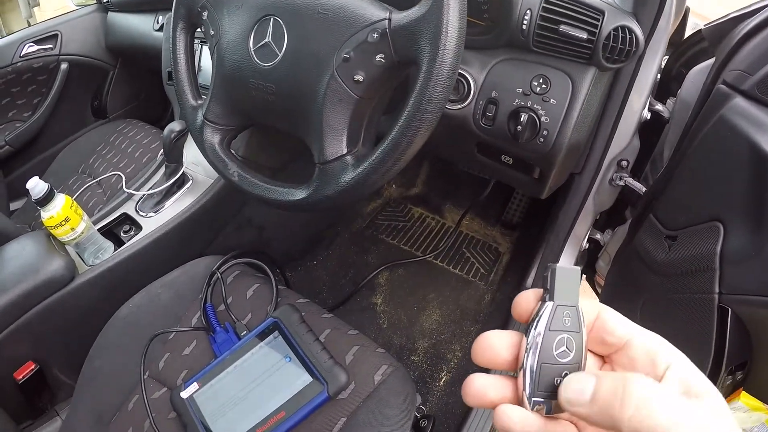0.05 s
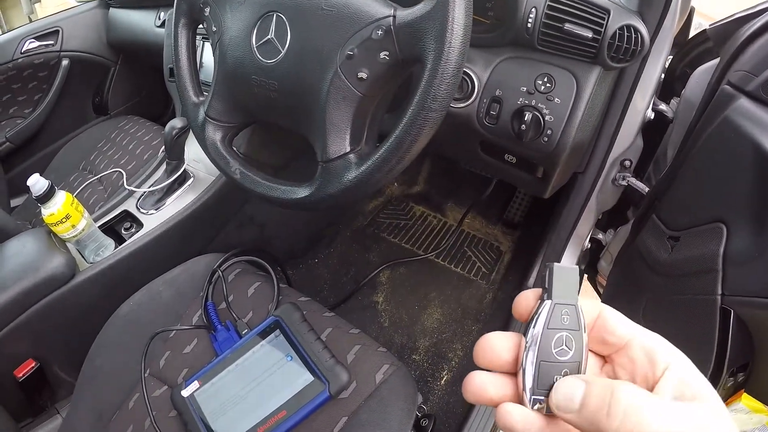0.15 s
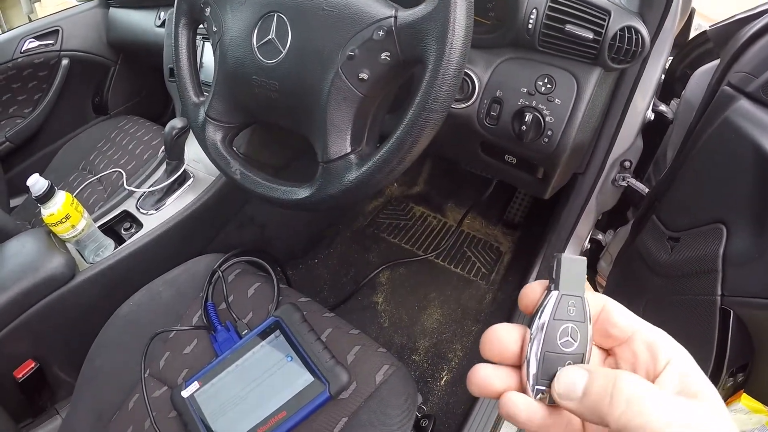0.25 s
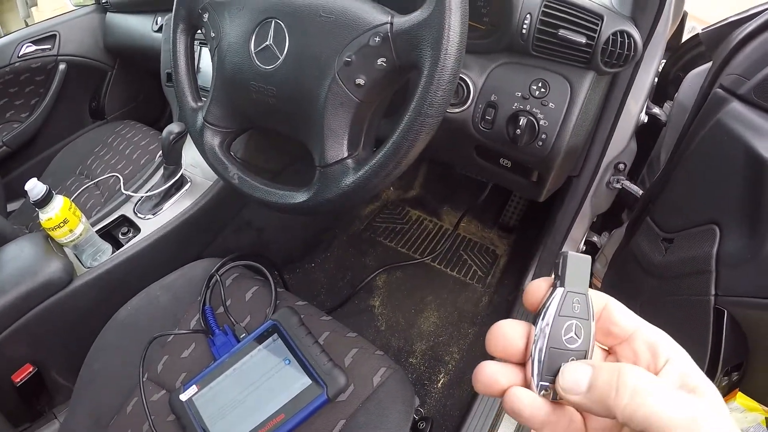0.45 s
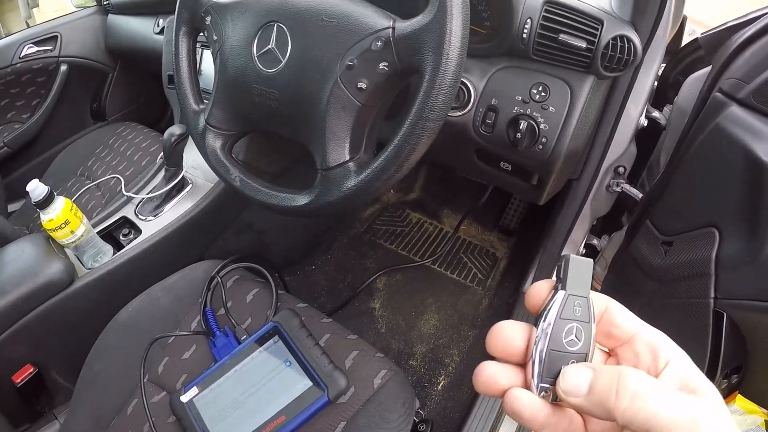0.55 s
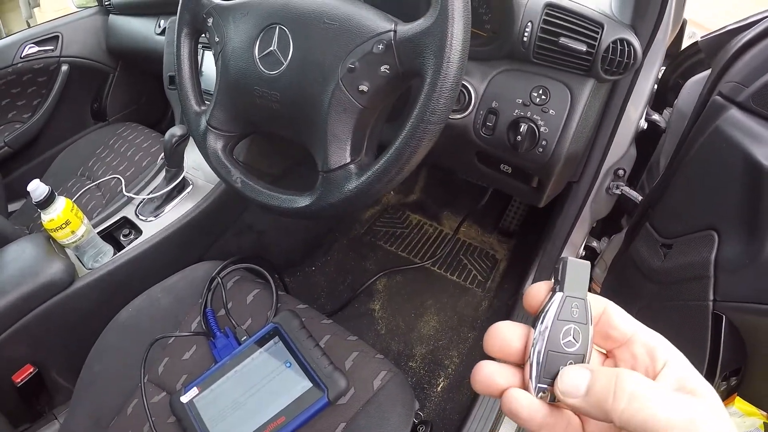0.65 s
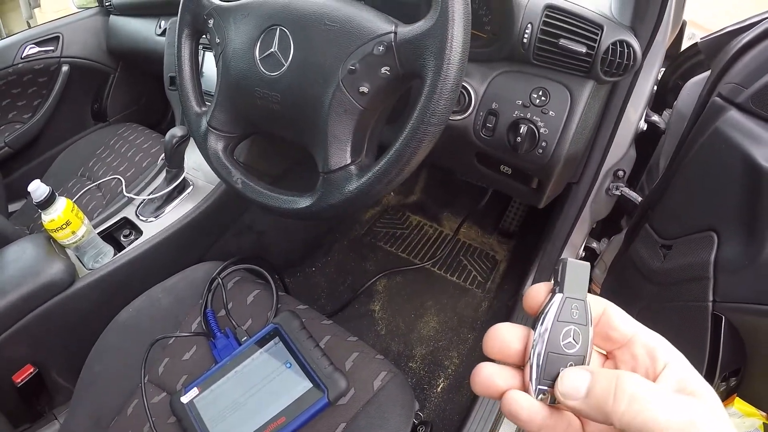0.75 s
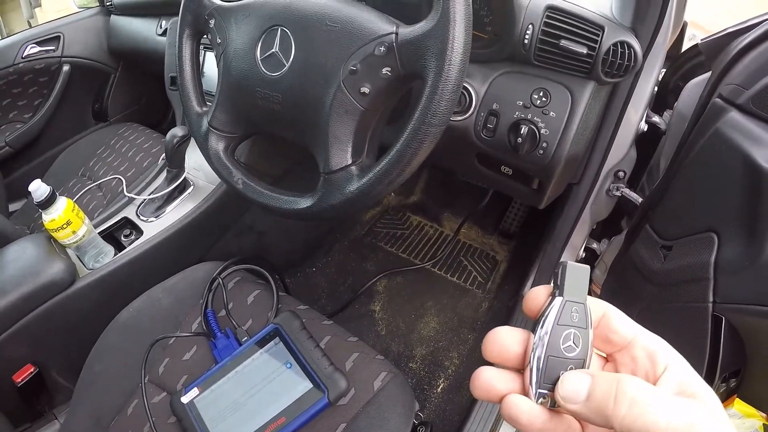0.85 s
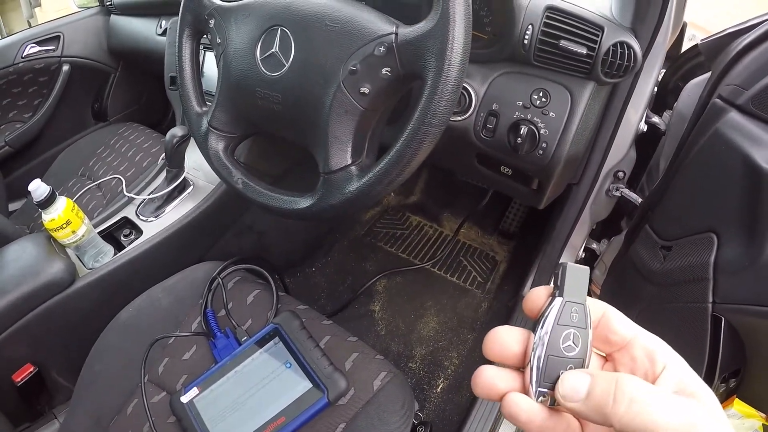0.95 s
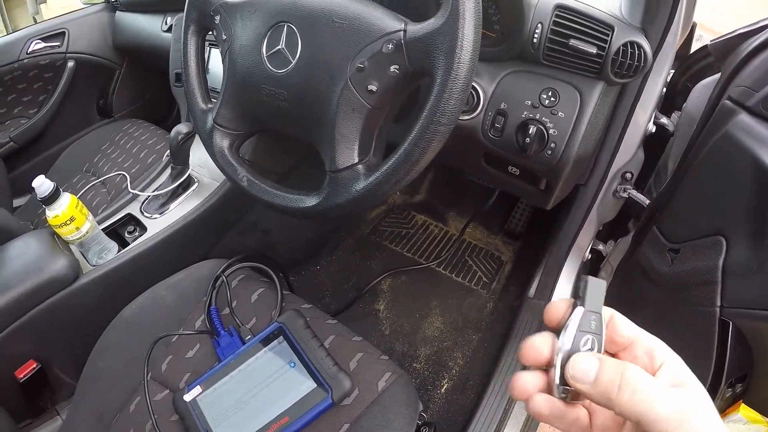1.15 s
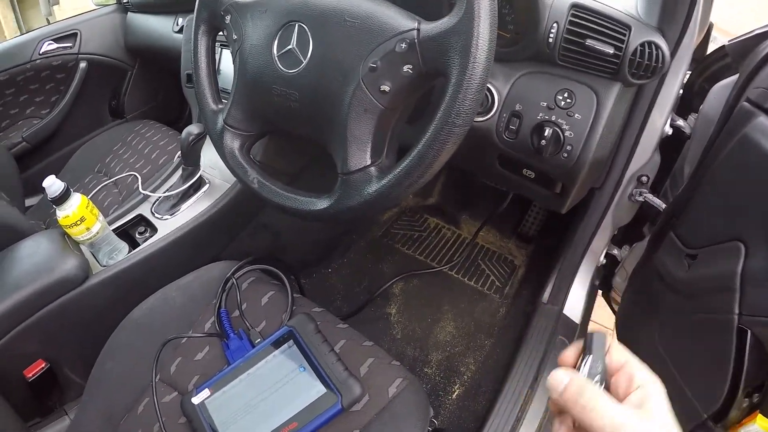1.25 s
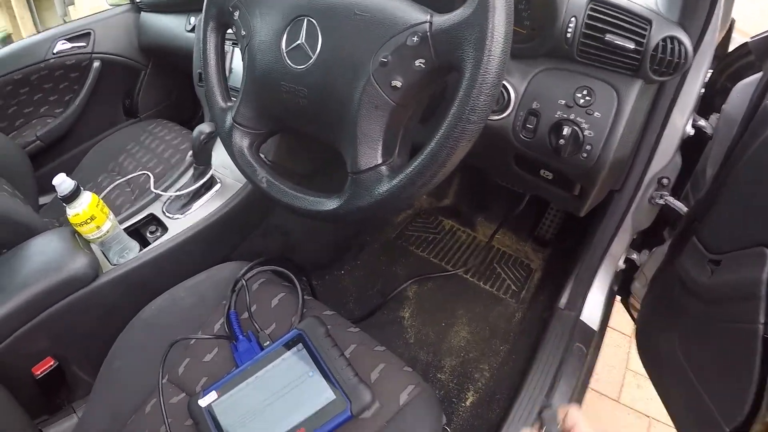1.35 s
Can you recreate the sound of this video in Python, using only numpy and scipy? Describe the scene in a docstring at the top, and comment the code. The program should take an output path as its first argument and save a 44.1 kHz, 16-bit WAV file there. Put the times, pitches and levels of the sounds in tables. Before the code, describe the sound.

Close press and release of a key fob button, followed by quiet car locks working.

```python
"""Key fob and central locking

At the open door of a car, a plastic key fob is pressed and released close to the microphone.
The locks answer: actuators clack, their small motors whir and hit their stops, a metal link ticks,
a last lock clunks. A light breeze puffs on the microphone over quiet outdoor air."""
import sys
import numpy as np
from scipy import signal
from scipy.fft import rfft, irfft
from scipy.io import wavfile

SR = 44100
rng = np.random.default_rng(int(sys.argv[2]) if len(sys.argv) > 2 else 0)


def master_out(mix):
    """Clip the mix to full scale and print it as 16-bit PCM to the path in sys.argv[1]."""
    frames = np.transpose(np.atleast_2d(mix))
    ceiling = np.clip(frames, -1, 1)
    pcm = np.round(ceiling * 32767).astype(np.int16)
    wavfile.write(sys.argv[1], SR, pcm)


N = 61739

# button down, then up, close to the microphone (time [s], level [dB], signed push, tilt [dB/octave])
BUTTON_STROKES = [(.3067, -0.5, -1.015, 1.5), (0.7363, 2, 0.95, 1.5)]
# snap of the switch dome (frequency [Hz], level [dB])
DOME_SPECTRUM = [(300, -54), (560, -15.5), (950, -6), (1500, -3.5), (2300, 0), (2800, 5), (3300, -9.5),
                 (4400, -12), (6200, -16), (8500, -27), (13000, -27.5), (16000, -43)]
# the fob's plastic shell (frequency [Hz], level [dB], t60 [s])
SHELL_MODES = [(1700, -52, 0.049), (2110, -51, 0.048), (2320, -43, 0.041), (2500, -45, 0.052),
               (2725, -43, 0.023), (3010, -43, 0.037), (3490, -48.5, 0.037), (4460, -39, .02),
               (5310, -56, 0.041), (6300, -43.5, 0.024)]
# the cabin, heard through the open door (frequency [Hz], level [dB])
CABIN_SPECTRUM = [(400, 3), (1000, -14), (1700, 1.5), (2800, 1.5), (4500, -8), (7000, -17), (15000, -23)]
# the button settling in its seat (frequency [Hz], level [dB])
CHATTER_SPECTRUM = [(500, -36), (1000, -1), (3000, 2.5), (6000, -6.5), (15000, -12.5)]
CABIN_DELAY_S = 0.0065


def fob():
    """Close up, the switch dome snaps, the shell rings and the button settles; the cabin answers."""
    out = np.zeros(N)
    for s, db, push, tilt in BUTTON_STROKES:
        snap = amp(-7.5) * impulse(s, DOME_SPECTRUM, tilt)
        shell = ring(s, SHELL_MODES, rise_s=0.00065)
        cabin = amp(-42) * noise(CABIN_SPECTRUM) * fade(s + CABIN_DELAY_S, t60=0.034, rise_s=0.0013)
        chatter = amp(-34.5) * noise(CHATTER_SPECTRUM) * fade(s, t60=0.016, rise_s=0.00019)
        out += amp(db) * (push * (snap + shell) + cabin + chatter)
    return out


# actuator blows (time [s], level [dB], t60 [s], tilt [dB/octave], crack [dB], treble cutoff [Hz])
ACTUATOR_BLOWS = [(0.7936, -38, 0.09, -2, 2, 11000), (.801, -40, 0.058, -1, -16, 8950),
                  (.965, -39, 0.082, 2, -12, 9000), (0.976, -41, 0.059, 1, -19, 8000),
                  (1.296, -40, 0.056, 1.5, -14, 4870), (1.304, -46.5, 0.26, -0.5, -19, 4560)]
# a blow heard through the door panel (frequency [Hz], level [dB])
DOOR_SPECTRUM = [(88, -39), (150, -2.5), (243, -6), (337, -2), (1030, -7), (1600, -9.5), (1730, -7.5),
                 (2140, -18), (2310, -12.5), (4370, -19.5), (4720, -18.5), (7940, -36.5), (15000, -44)]
# crack of the actuator housing (frequency [Hz], level [dB])
HOUSING_SPECTRUM = [(600, -17), (1500, -10), (2100, 8.5), (2600, -4.5), (3050, 3.5), (3700, -8.5),
                    (4500, -10), (6000, -19), (7400, -19.5), (14000, -37)]
# the door panel ringing (frequency [Hz], level [dB], t60 [s])
PANEL_MODES = [(357.4, -13.5, 0.36), (775, -14, 0.16), (895, -12.5, 0.14), (1042, -8.5, .11),
               (1271, -10, 0.11), (1523, -16, 0.099), (1780, -8, .12), (2480, -18, 0.12),
               (4130, -15.5, .07)]
CLACK_RISE_S = 0.0017


def actuator_clacks():
    """Actuators start and hit their stops: housings crack, the panel rings, trim swallows the treble."""
    out = np.zeros(N)
    for s, db, t60, tilt, crack_db, cutoff_hz in ACTUATOR_BLOWS:
        blow = noise(DOOR_SPECTRUM, tilt) + amp(crack_db) * noise(HOUSING_SPECTRUM)
        blow *= fade(s, t60, CLACK_RISE_S)
        panel = ring(s, PANEL_MODES, tilt, CLACK_RISE_S)
        trim = signal.butter(3, cutoff_hz, fs=SR, output="sos")
        out += amp(db) * signal.sosfilt(trim, blow + panel)
    return out


# thuds from inside the door (time [s], level [dB])
DOOR_THUDS = [(.803, -35.5), (.975, -51), (1.309, -50.5)]
# the door's hollow body (frequency [Hz], level [dB], t60 [s])
BODY_MODES = [(184, -8, 0.11), (223.8, 4, 0.11), (302, -5, 0.18), (440.3, -7, 0.25), (720, 4.5, 0.045),
              (869, -10, 0.11)]


def door_thuds():
    """The hollow door booms briefly with each pair of clacks."""
    return sum(amp(db) * ring(s, BODY_MODES, rise_s=0.004) for s, db in DOOR_THUDS)


# tone of the meshing gears (multiple of the mesh pitch, level [dB])
MESH_HARMONICS = [(1, -47), (3, -57.5), (5, -62)]
# rasp of the gears (frequency [Hz], level [dB])
RASP_SPECTRUM = [(88, -23), (150, 2.5), (350, -16), (535, -0.5), (636, -12), (742, -3.5), (1200, -20),
                 (1800, -13), (2060, -19), (2550, -9), (2750, -17), (3470, -13), (6550, -37.5),
                 (11200, -52), (15000, -44)]
MOTOR_ON_S, MOTOR_OFF_S, MOTOR_RISE_S, MOTOR_STOP_S = 0.80, 0.98, 0.011, 0.013
MESH_HZ, SPIN_UP_S, TONE_RISE_S = 536, 0.019, 0.097
WAVER_DEPTH, TOOTH_DEPTH = 0.0053, 0.53


def lock_motors():
    """Small geared motors spin up: a swelling mesh tone and a rasp that pulses with each tooth."""
    drive = rise(MOTOR_ON_S, MOTOR_RISE_S) * np.exp(-since(MOTOR_OFF_S) / MOTOR_STOP_S)
    waver = 1 + WAVER_DEPTH * noise([(1, 0), (40, 0), (120, -60)])
    pitch_hz = MESH_HZ * rise(MOTOR_ON_S, SPIN_UP_S) * waver
    phase = 2 * np.pi * np.cumsum(pitch_hz) / SR
    tone = np.sqrt(2) * sum(amp(db) * np.sin(k * phase) for k, db in MESH_HARMONICS)
    rasp = amp(-47) * noise(RASP_SPECTRUM) * (1 + TOOTH_DEPTH * np.cos(phase))
    return drive * (rise(MOTOR_ON_S, TONE_RISE_S) * tone + rasp)


# ticks of the linkage (time [s], level [dB], t60 [s], tilt [dB/octave], sizzle [dB], ring [dB])
LINK_TICKS = [(.8765, -41, 0.049, -0.5, -6.5, -6.5), (1.2295, -46, .06, -1, -16, 2),
              (1.268, -61, 0.036, 1, -22, -8)]
# colour of a tick (frequency [Hz], level [dB])
TICK_SPECTRUM = [(250, -22), (1200, -6), (2200, -1.5), (4000, 2), (5800, -5.5), (9000, -9.5),
                 (14500, -11.5)]
# high sizzle on a tick (frequency [Hz], level [dB])
SIZZLE_SPECTRUM = [(3000, -54), (9000, -5.5), (11500, -14), (13200, 1), (15000, -12.5)]
# the metal link ringing (frequency [Hz], level [dB], t60 [s])
METAL_MODES = [(626, -10, 0.19), (2190, -8, 0.053), (2980, -7, 0.077), (3975, 1.5, 0.045),
               (5010, -11.5, 0.042), (6700, -2.5, 0.018)]


def linkage_ticks():
    """The lock's metal linkage ticks brightly and rings."""
    out = np.zeros(N)
    for s, db, t60, tilt, sizzle_db, ring_db in LINK_TICKS:
        tick = noise(TICK_SPECTRUM, tilt) + amp(sizzle_db) * noise(SIZZLE_SPECTRUM)
        tick *= fade(s, t60, rise_s=0.00076)
        out += amp(db) * (tick + amp(ring_db) * ring(s, METAL_MODES))
    return out


# click of the relay (frequency [Hz], level [dB])
RELAY_SPECTRUM = [(900, -18), (1700, -7), (2500, 0), (3800, -21), (12000, -36)]


def relay():
    """A relay drops with a faint, dull click after the motors stop."""
    return amp(-44.5) * noise(RELAY_SPECTRUM) * fade(s=1.0768, t60=0.0074, rise_s=0.00022)


# strength of the breeze at the microphone (time [s], level [dB])
BREEZE_LEVELS = [(0, -49.5), (.14, -47), (.21, -33), (.30, -27.5), (.385, -28), (.42, -39.5), (.52, -30),
                 (.62, -38.5), (.72, -40.5), (.78, -47), (.85, -40.5), (1.0, -46.5), (1.18, -47),
                 (1.26, -51), (1.4, -50)]
# wind rumble on the microphone (frequency [Hz], level [dB])
RUMBLE_SPECTRUM = [(15, -13), (30, -1.5), (60, -6), (90, -9.5), (130, -25.5), (200, -44.5), (400, -51.5),
                   (1000, -96)]
# single puffs on the microphone (time [s], level [dB], half width [s])
WIND_PUFFS = [(.238, -14.5, .0026), (0.261, -21.5, 0.0057), (0.286, -23.5, 0.0033), (.351, -6, .0023),
              (0.4522, -27, .0018), (0.514, -30, 0.0019), (0.534, -36.5, 0.0012), (0.641, -26, 0.0027)]
# fluttering air (frequency [Hz], level [dB])
TURBULENCE_SPECTRUM = [(40, -7), (90, -4.5), (160, 0), (260, -17.5), (420, -27), (900, -82)]
SUCTION_DELAY_S, SUCTION_SHARE = 0.00954, 0.82


def breeze():
    """Wind right on the microphone: a low rumble, puffs that push, pull and flutter, and one eddy."""
    rumble = amp(np.interp(since(0), *np.transpose(BREEZE_LEVELS))) * noise(RUMBLE_SPECTRUM)
    puffs = sum(amp(db) * (bump(s, width) - SUCTION_SHARE * bump(s + SUCTION_DELAY_S, width))
                for s, db, width in WIND_PUFFS)
    flutter = amp(-24) * sum(amp(db) * bump(s, width_s=0.0096) for s, db, _ in WIND_PUFFS)
    eddy = amp(-34.5) * bump(s=0.5347, width_s=0.019)
    return rumble + puffs + (flutter + eddy) * noise(TURBULENCE_SPECTRUM)


# open air around the car (frequency [Hz], level [dB])
AIR_SPECTRUM = [(60, -8.5), (130, -8), (220, -7.5), (480, -14), (800, -16.5), (1450, -23.5), (3900, -27.5),
                (8000, -33), (15000, -39.5)]
# a soft rustle (frequency [Hz], level [dB])
RUSTLE_SPECTRUM = [(100, -3), (200, 8), (330, -11), (600, -25), (1200, -16), (3000, -38), (10000, -45)]


def outdoor_air():
    """Quiet, steady air around the car, and a soft rustle that dies away at the start."""
    air = amp(-59.5) * noise(AIR_SPECTRUM)
    rustle = amp(-46) * noise(RUSTLE_SPECTRUM) * fade(0, t60=0.24, rise_s=0.013)
    return air + rustle


def amp(db):
    """Decibels to gain."""
    return 10 ** (np.asarray(db) / 20)


def since(s):
    """Seconds since time s, zero before it."""
    return np.maximum(np.arange(N) / SR - s, 0)


def rise(s, rise_s):
    """Exponential climb from 0 towards 1, starting at s."""
    return 1 - np.exp(-since(s) / rise_s)


def fade(s, t60, rise_s):
    """Quick attack at s, then a decay of 60 dB every t60 seconds."""
    return rise(s, rise_s) * np.exp(-np.log(1000) * since(s) / t60)


def bump(s, width_s):
    """Bell-shaped swell centred on s."""
    return np.exp(-0.5 * ((since(0) - s) / width_s) ** 2)


def gains(spectrum, tilt_db):
    """Gain on the FFT grid from (Hz, dB) points, tilted by tilt_db per octave about 2 kHz."""
    points_hz, db = np.transpose(spectrum)
    hz = np.fft.rfftfreq(2 * N, 1 / SR) + 1
    octaves = np.log2(np.maximum(hz, 150) / 2000)
    return amp(np.interp(np.log(hz), np.log(points_hz), db) + tilt_db * octaves)


def noise(spectrum, tilt_db=0):
    """Coloured noise of rms 1."""
    white = rng.standard_normal(2 * N)
    coloured = irfft(rfft(white) * gains(spectrum, tilt_db))[:N]
    return coloured / np.sqrt(np.mean(coloured ** 2) + 1e-20)


def impulse(s, spectrum, tilt_db):
    """A coloured click of energy 1 at time s."""
    cepstrum = irfft(np.log(np.maximum(gains(spectrum, tilt_db), 1e-4)))
    cepstrum[1:N] *= 2  # minimum phase: nothing sounds before the strike
    cepstrum[N + 1:] = 0
    click = irfft(np.exp(rfft(cepstrum)))[:N]
    return np.pad(click / np.linalg.norm(click), (int(s * SR), 0))[:N]


def ring(s, modes, tilt_db=0, rise_s=0.00043):
    """Damped modes struck at s, their levels a little different each time."""
    out = np.zeros(N)
    for hz, db, t60 in modes:
        gain = amp(db + rng.normal(0, 1) + tilt_db * np.log2(hz / 2000))
        out += gain * fade(s, t60, rise_s) * np.sin(2 * np.pi * hz * since(s))
    return out


def scene():
    """Fob, locks, breeze and air at one microphone by the open car door."""
    mix = fob() + actuator_clacks() + door_thuds() + linkage_ticks() + relay() + lock_motors()
    return (mix + breeze() + outdoor_air())[None]


BAND_LIMIT_HZ = 15700


def record(dry):
    """The microphone's channel passes nothing above the band limit."""
    passband = np.fft.rfftfreq(2 * N, 1 / SR) < BAND_LIMIT_HZ
    return irfft(rfft(dry, 2 * N) * passband)[:, :N]


dry = scene()
out = record(dry)
master_out(out)
```